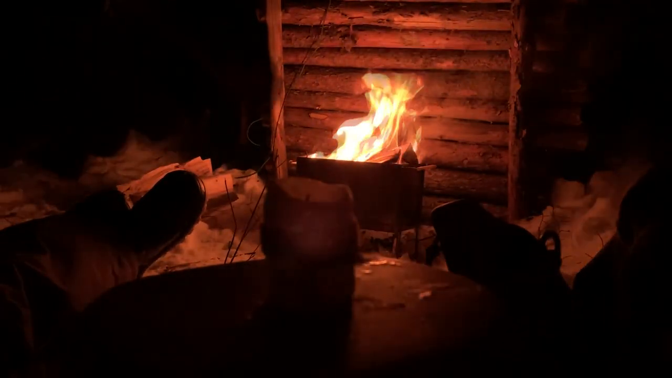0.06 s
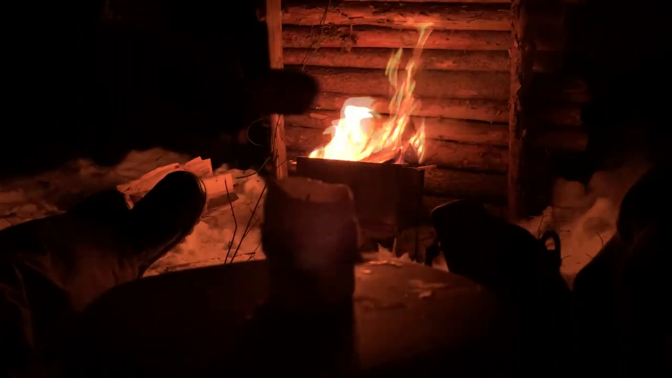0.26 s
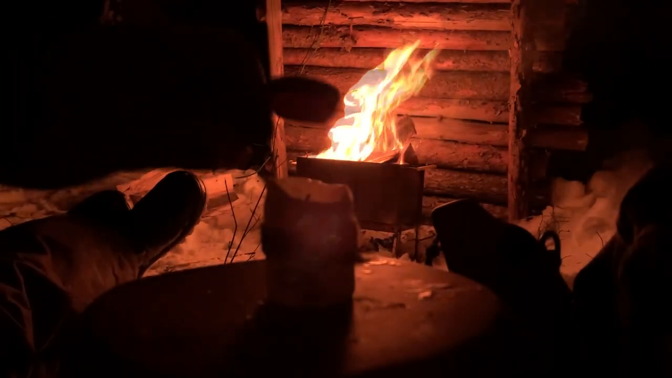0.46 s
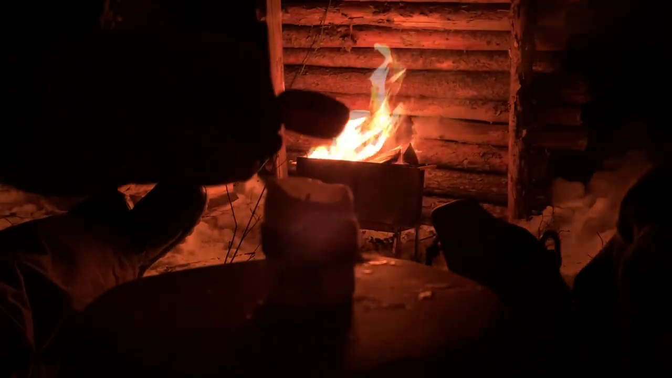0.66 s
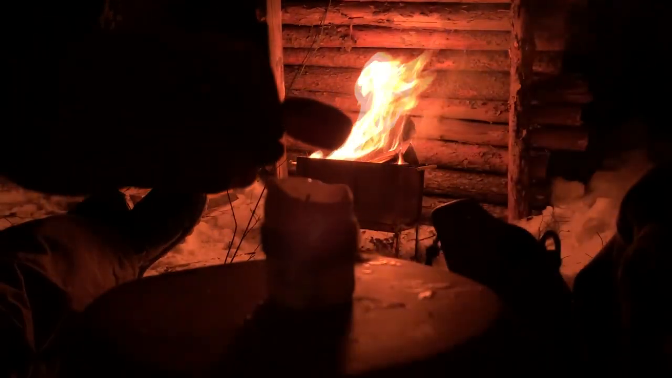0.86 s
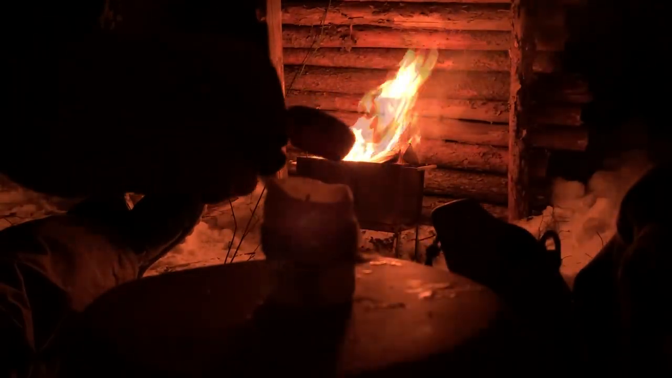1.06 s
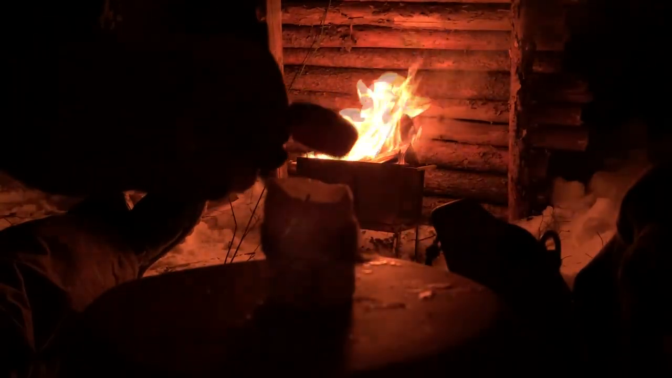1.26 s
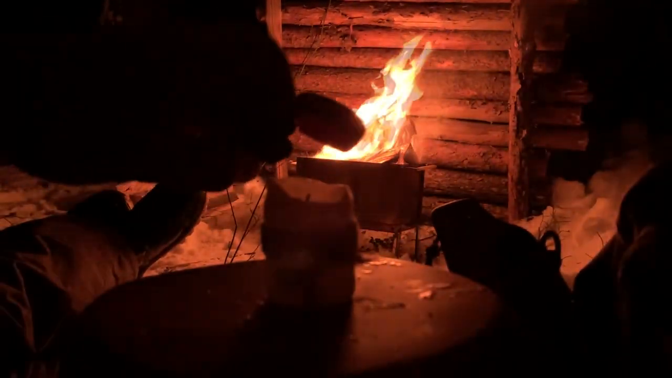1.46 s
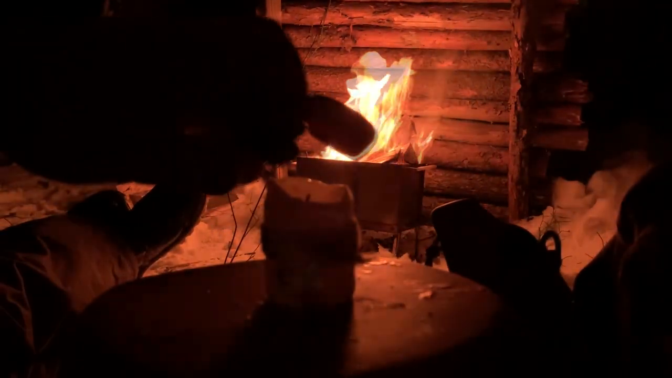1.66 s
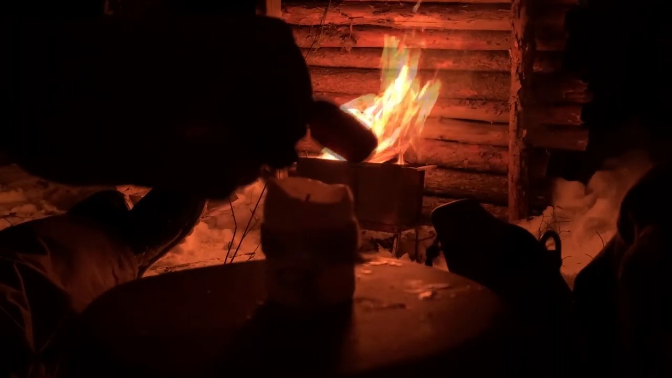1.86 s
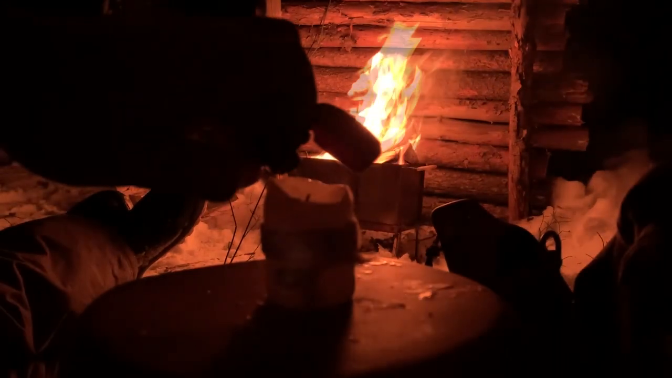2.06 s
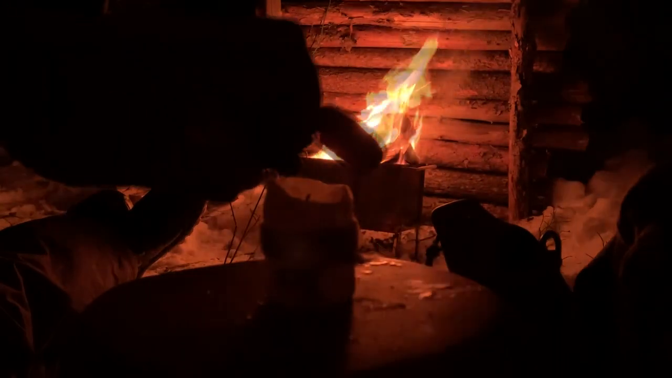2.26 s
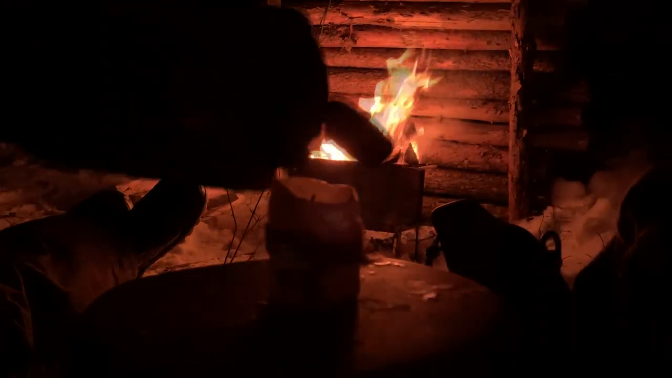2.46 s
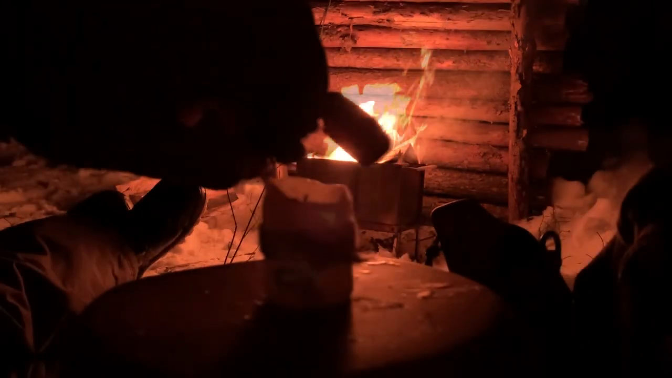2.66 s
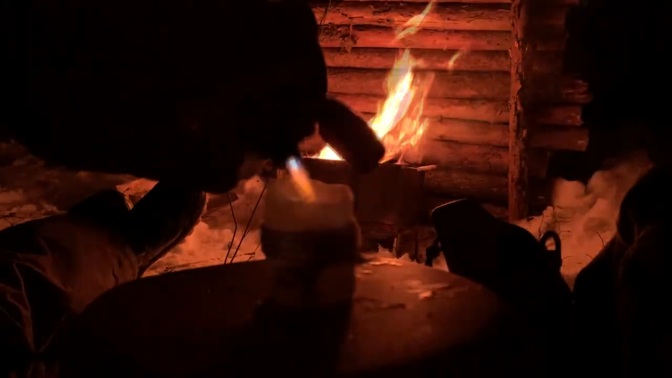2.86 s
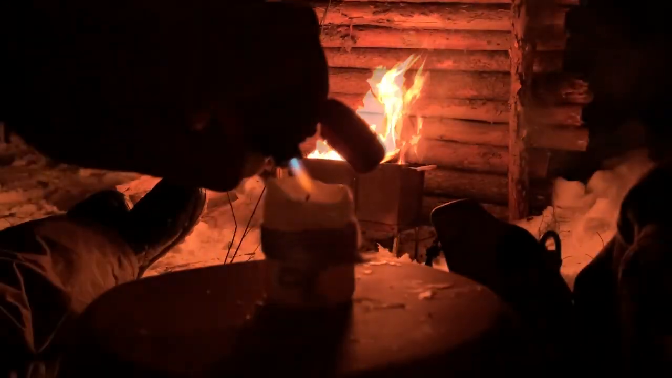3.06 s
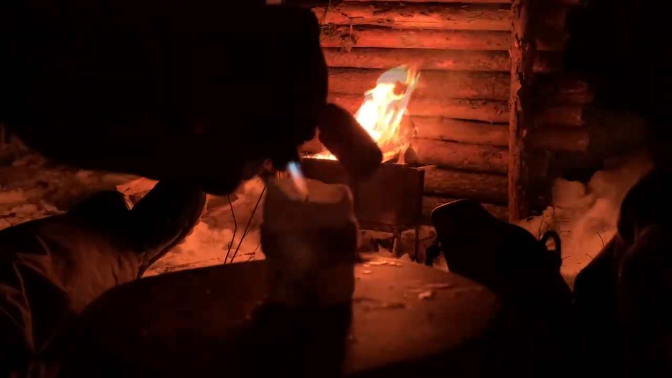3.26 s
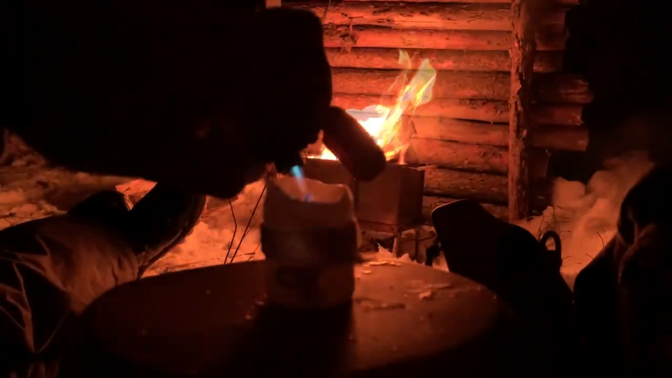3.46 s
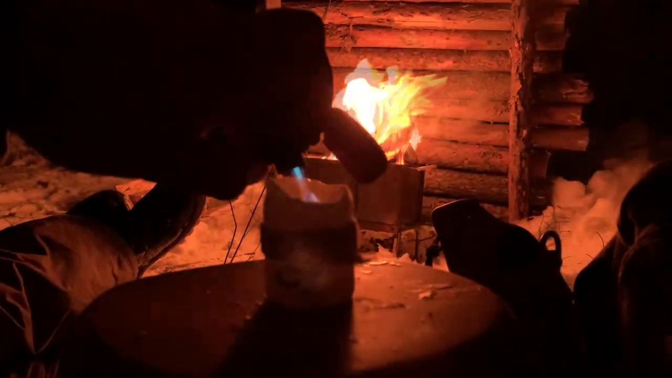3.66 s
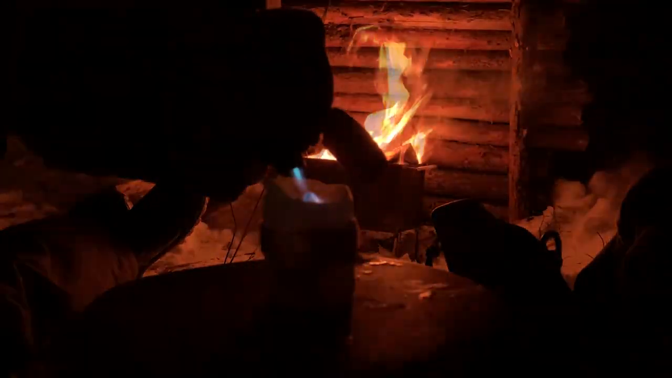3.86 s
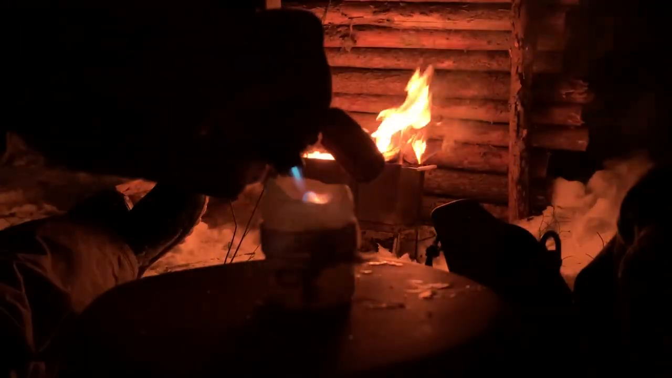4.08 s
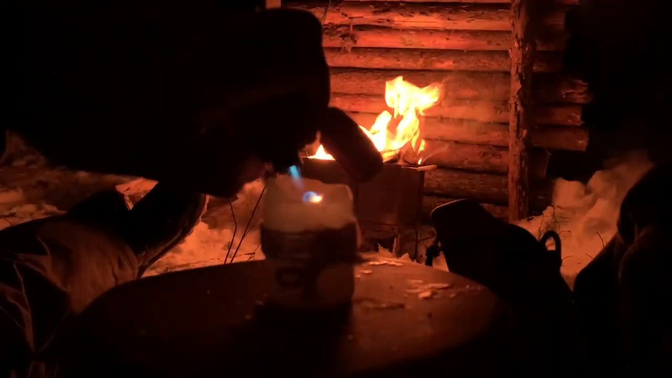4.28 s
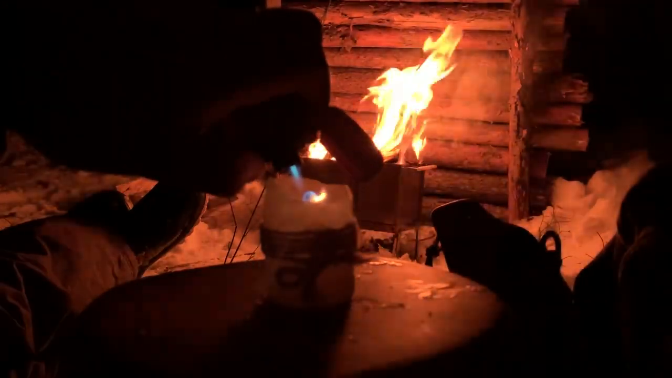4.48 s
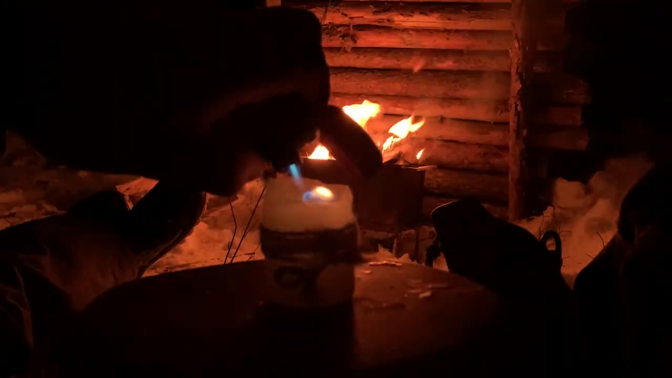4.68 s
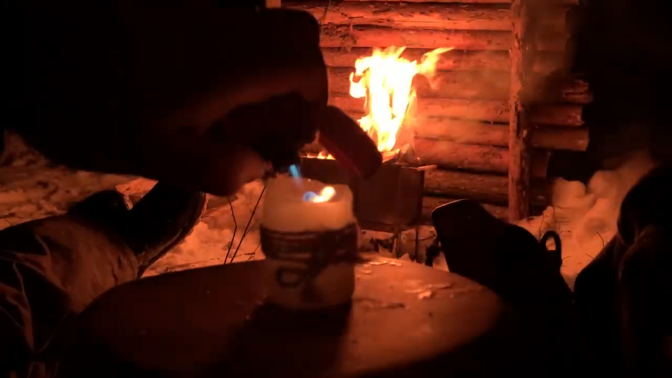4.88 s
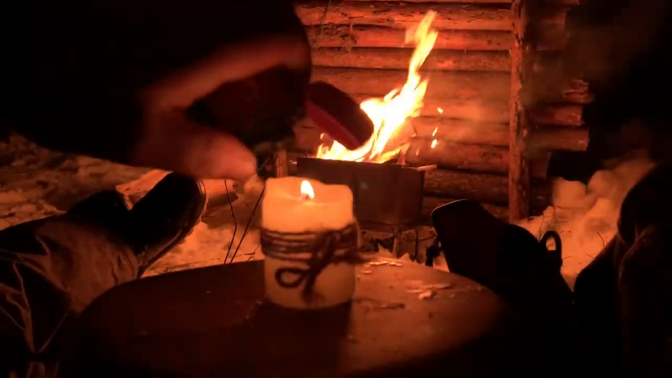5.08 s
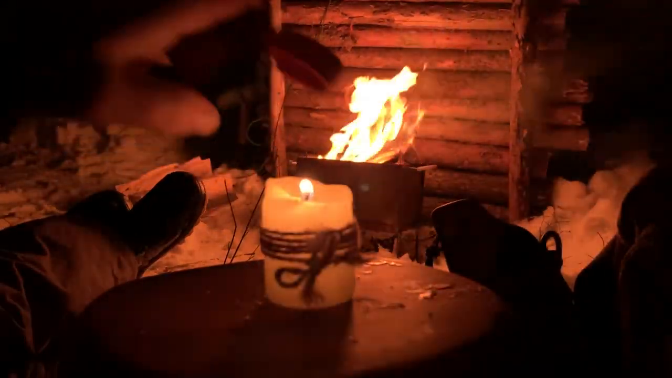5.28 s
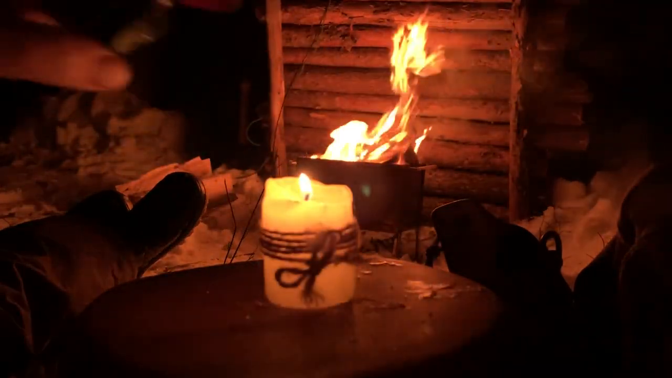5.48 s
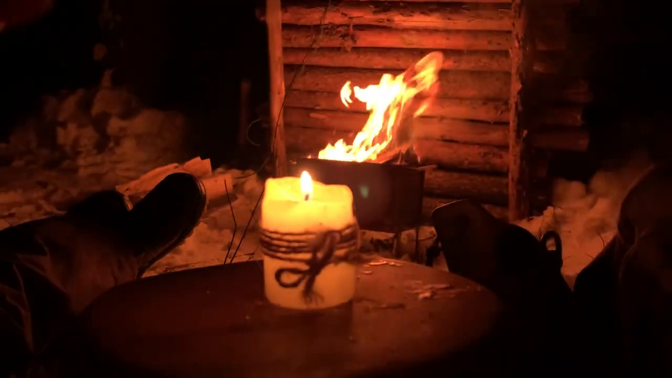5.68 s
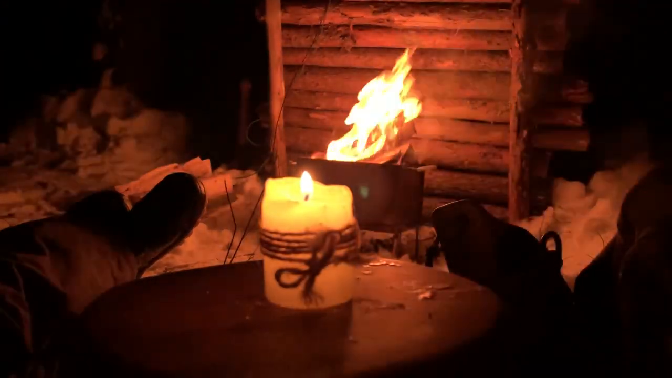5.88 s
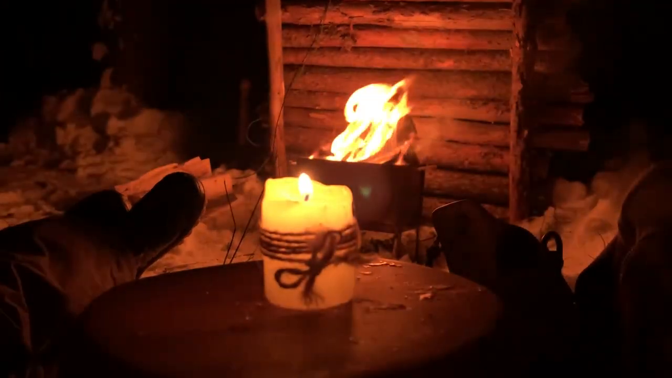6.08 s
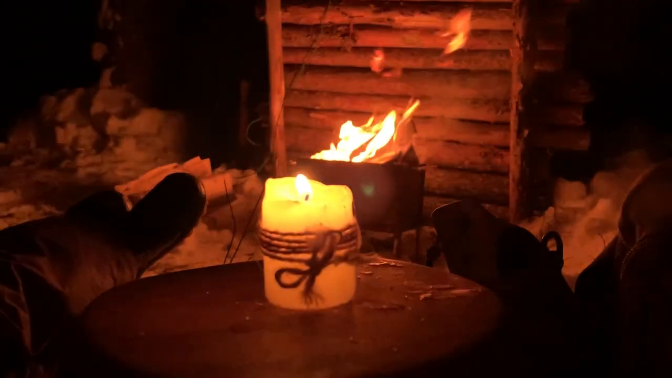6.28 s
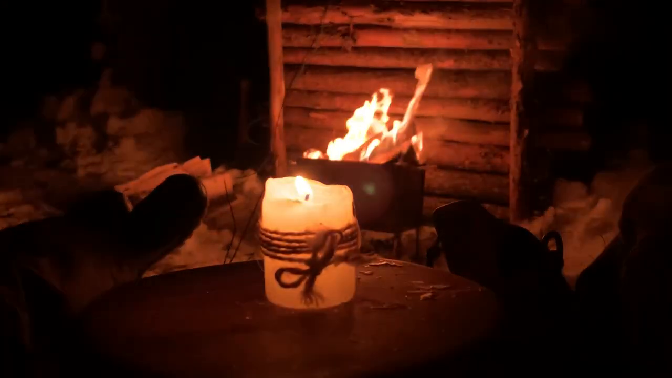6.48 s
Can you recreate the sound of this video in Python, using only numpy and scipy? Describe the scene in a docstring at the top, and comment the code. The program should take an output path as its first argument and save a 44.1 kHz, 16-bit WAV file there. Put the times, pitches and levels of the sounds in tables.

```python
"""A wood fire flutters at a night camp and a jacket sleeve swishes; close by, a torch lighter lights a candle.
Gas hisses, the piezo hammer snaps and fails, the trigger springs back; a second snap lights a softly roaring jet.
Wax sputters at the wick, the trigger is let go, the sleeve swishes back and the lighter drops on the table.
Fire, gas, flame and wax start from shaped noise, rubbing from random tiny slips,
and knocks from short bursts of noise and fading notes."""
import sys
import numpy as np
from scipy import signal
from scipy.fft import rfft, irfft, next_fast_len
from scipy.io import wavfile
from scipy.ndimage import uniform_filter1d

SR = 44100
rng = np.random.default_rng(int(sys.argv[2]) if len(sys.argv) > 2 else 0)


def bounce(signal):
    """Save signal as a 16-bit WAV file at the path given by the first command-line argument."""
    frames = np.transpose(np.atleast_2d(signal))
    limited = np.clip(frames, -1, 1)
    pcm = np.round(limited * 32767).astype(np.int16)
    wavfile.write(sys.argv[1], SR, pcm)


N = 287973
TIME = np.arange(N) / SR  # seconds, whole scene
HIT = TIME[:SR // 6]  # seconds, one short blow

# Surges of the fire. Each row: start in seconds, length in seconds, rise in dB.
SURGES = [(0.1, 0.58, 5), (1.1, 0.19, 4.5), (2.2, 0.4, 1.5), (2.88, 0.69, 4), (3.65, 0.41, 4.5),
          (4.047, 0.72, 5), (4.817, 0.31, 7), (5.199, 0.63, 5.5), (5.95, 0.31, 4.5)]
# Strokes of the sleeve. Each row: start, attack, hold and release in seconds,
# then levels of the rubbing, the hiss of the weave and the sizzle in dB.
STROKES = [(0.0, 0.0033, 0.04, 0.5, -66, -89, -100), (5.196, 0.34, 0.037, .45, -61, -75, -80.5),
           (5.509, 0.048, 0.016, 0.3, -58, -61, -62), (5.65, 0.12, .45, 0.55, -68, -76, -81.5),
           (5.978, 0.078, 0.07, 0.24, -47, -51.5, -58), (6.392, 0.097, 0.044, 0.11, -61.5, -72, -88)]
# Thin notes in the rubbing. Each row: start, attack, hold and release in seconds, pitch in Hz,
# middle level in dB.
SQUEAKS = [(0.0, .02, .1, .4, 884, -72), (5.826, .06, .08, .06, 2610, -75)]
# Creaks and ticks of the grip and the wick. Each row: time in seconds, level in dB before a 2 dB cut,
# treble against the whole in dB, centre of the treble in Hz.
TICKS = [(0.42, -63, -17, 5000), (0.589, -68, -3, 4930), (1.131, -61.5, -22, 5030),
         (1.191, -65, -3.5, 6800), (1.231, -64, -24, 5000), (1.334, -53, -12, 4700),
         (1.442, -56.5, -5.5, 6800), (1.477, -58.5, -2, 6300), (1.501, -56.5, 0, 6300),
         (1.536, -64.5, 1, 6550), (2.302, -52.5, -18, 5000), (2.326, -59.5, -15, 5000),
         (2.383, -54, -15, 5000), (3.596, -59, -2, 5830), (3.66, -61.5, -5, 14000),
         (3.834, -58.5, -3.5, 4700), (4.067, -64, -5, 7000), (4.112, -66, 1.5, 12850),
         (4.305, -57.5, -4, 9350), (4.494, -58.5, -2, 7900), (4.784, -61, -6, 14000),
         (4.883, -57, -4, 4980)]
# The trigger hits its stops. Each row: time in seconds, level in dB, first contact note in dB,
# bright share in dB, ring of a steel part in Hz, level of that ring in dB.
TRIGGER_STOPS = [(0.9526, -51, 6, -20, 2930, -10), (2.4668, -31.5, 8, -3, 5950, -10.5),
                 (2.5721, -38.5, -1, -19, 2550, -13.5), (5.0275, -37.5, 17.5, 2, 5990, -14.5)]
# Dull low thumps. Each row: time in seconds, level in dB, pitch in Hz, time to fade by 60 dB in seconds.
THUMPS = [(1.131, -43, 103.6, 0.21), (1.641, -35, 125, 0.059), (1.678, -33, 90, 0.092),
          (1.85, -35, 113, 0.077), (1.927, -38, 99.5, 0.048), (2.371, -36.5, 127, 0.062),
          (2.7848, -15, 158.5, 0.03), (5.314, -38, 145.5, 0.06)]
# Openings of the gas valve. Each row: start, attack, hold and release in seconds,
# starting levels of the hiss and of its thin top in dB.
GAS_BURSTS = [(1.692, 0.033, .06, 0.11, -67, -51), (2.0, 0.026, .36, 0.07, -62, -52),
              (2.655, .05, .02, .06, -62, -58), (2.78, 0.0096, .01, .07, -72.5, -67)]
# Piezo hammer snaps. Each row: time in seconds, level in dB, delay of the rebound in seconds,
# rebound against the snap in dB before a further 1 dB cut.
SNAPS = [(2.0015, -20, 0.0028, -8), (2.7815, -20, 0.0034, -5.5)]
# The thumb drags on the trigger. Each row: start, attack, hold and release in seconds, middle level in dB.
THUMB_DRAGS = [(2.3, 0.093, 0.017, 0.023, -62), (2.458, 0.014, .01, 0.098, -58.5),
               (2.52, .055, .035, .03, -62.5), (5.027, 0.017, 0.01, 0.055, -60.5)]
# Slow level path of the burning jet. Each row: time in seconds, level in dB.
FLAME_LEVEL = [(2.85, -62), (3.244, -68.5), (3.45, -63), (4.47, -62.5), (4.85, -64.5)]
# The lighter lands on one end, then flat. Each row: time in seconds, level in dB.
LANDING = [(6.2705, -15), (6.2732, -13)]

# Ringing notes of the lighter's case. Each row: pitch in Hz, level in dB, time to fade by 60 dB in seconds.
CASE_MODES = [(1690, -8.5, .022), (2035, -6, .025), (2425, -12, 0.041), (2834, -6.5, 0.037),
              (4600, -13, 0.056), (4990, -11.5, 0.022), (8900, -12, .035), (10700, -8.5, 0.023),
              (11400, -11, 0.018), (12400, -6.5, 0.044)]
# Ringing notes of the table top under a sharp knock. Each row: pitch in Hz, level in dB,
# time to fade by 60 dB in seconds.
TABLE_MODES = [(474, -13, 0.0066), (770, -7, 0.012), (1055, -9.5, 0.018), (1392, 0.5, 0.011),
               (2930, 5, 0.014), (3300, -2, 0.027)]

# Tone of the fluttering fire. Each row: pitch in Hz, relative level in dB.
FLUTTER_COLOUR = [(25, -27), (38, -12.5), (54, -2.5), (80, -0.5), (110, -1), (160, -2.5), (195, -7.5),
                  (240, -14.5), (325, -23), (420, -32), (700, -40.5)]
# Tone of the still air. Each row: pitch in Hz, relative level in dB.
AIR_COLOUR = [(500, -3.5), (650, -5.5), (1200, -8), (2400, -11), (3500, -13.5), (8700, -13), (16000, -14.5)]
# Tone of the rubbing cloth. Each row: pitch in Hz, relative level in dB.
CLOTH_COLOUR = [(250, -1.5), (350, 0.5), (500, -1), (650, -0.5), (860, -2.5), (1250, -5.5), (1650, -9),
                (2000, -8.5), (2400, -10.5), (2720, -11), (3100, -11.5), (4200, -14), (7000, -21.5)]
# Tone of the hissing weave. Each row: pitch in Hz, relative level in dB.
WEAVE_COLOUR = [(2500, -16), (4200, -1.5), (6000, -4.5), (7500, -2.5), (9000, 1.5), (12500, 0), (14500, -4),
                (16000, -6.5)]
# Tone of gas whistling through the nozzle. Each row: pitch in Hz, relative level in dB.
NOZZLE_COLOUR = [(900, -25), (1300, -20.5), (2300, -15.5), (3900, -25), (4550, -8.5), (5000, -14),
                 (5700, -24.5), (6900, -24.5), (7700, -9.5), (8500, 4), (9600, -9.5), (12500, -20.5),
                 (16000, -25.5)]
# Tone of the thin top of the gas hiss. Each row: pitch in Hz, relative level in dB.
THIN_HISS_COLOUR = [(1150, -36.5), (1550, -10.5), (2000, -9), (2900, -9.5), (3500, -22.5), (4150, -22.5),
                    (4550, -7.5), (5100, -17), (6200, -16.5), (7300, -1.5), (10000, 0), (13000, -6),
                    (16000, -10)]
# Tone of skin dragging on the trigger. Each row: pitch in Hz, relative level in dB.
THUMB_COLOUR = [(700, -11.5), (1100, -6.5), (1400, -7), (1730, -4), (2000, -10), (2630, -4.5), (5500, -10),
                (9000, -8), (16000, -4)]
# Tone of the roaring jet. Each row: pitch in Hz, relative level in dB.
ROAR_COLOUR = [(150, -31), (250, 0.5), (334, -6.5), (412, 0.5), (513, 2), (678, -5.5), (779, 3.5),
               (994, -3.5), (1280, -3), (1620, -13), (1820, -21.5), (2110, -27.5), (2290, -20.5),
               (4000, -41), (5200, -67), (8800, -120)]

# More tones of single sounds, named for them. Each row: pitch in Hz, relative level in dB.
EMBER_COLOUR = [(1200, -0.5), (4700, -5.5), (8000, -5.5), (15000, -10)]
SIZZLE_COLOUR = [(9000, -20), (10500, -7.0), (12300, -15.5), (14400, 1.0), (16000, -11.5)]
DULL_TICK = [(700, -20.0), (1200, -13.5), (1650, 1.0), (2500, -10.5), (3500, -17.5), (7000, -29.5)]
HOLLOW_KNOCK = [(500, -20.0), (1020, -24), (1550, 1.0), (2850, -2.0), (3600, -15), (5000, -21),
                (8000, -17.5), (16000, -24)]
SHARP_CRACK = [(3000, -21.0), (5500, -12.0), (8500, -17.0), (10100, 0.0), (11500, -8), (16000, -18)]
STEEL_CLATTER = [(250, -17.5), (500, -21.5), (1100, -20), (1700, 0.0), (2800, 0.5), (3500, -4.5),
                 (5000, 0), (8000, 2.5), (10500, 3.5), (13000, 3), (16000, 0.0)]
JET_HISS = [(2700, 0.5), (3800, -7.5), (4700, 5.5), (5600, -9.0), (7300, -5), (9500, -0.5),
            (12000, -9.0), (14500, 1), (16000, -3.5)]
FLARE_COLOUR = [(1100, -0.5), (1800, -3), (3000, -11), (6000, -22.5), (11000, -22), (15000, -18)]
SPUTTER_COLOUR = [(1700, -3), (2500, 17), (3400, -16), (4700, -13), (6500, -16)]
CRACKLE_COLOUR = [(3000, 3), (5500, -4), (10000, -10), (14000, -9), (16000, -13)]
LANDING_CLACK = [(280, -22), (420, -7.5), (1400, -0.5), (2200, -3.5), (3100, 1.0), (4200, 1),
                 (7000, -1.0), (8200, -5.5), (10700, 4), (13000, -4.5), (16000, -2.5)]
TAIL_COLOUR = [(500, -3.0), (1500, 3.5), (3000, -7), (5500, -1.5), (15000, -9)]

FIRE_DB, FIRE_SWELL_DB, FIRE_FLICKER_DB = -60, 0.95, 1.4  # calm level, its slow and its quick spread
EMBERS_DB, AIR_DB = -99, -81
TICK_T60_S = .022
SAG_DB_PER_S, TOP_SAG_DB_PER_S = 28.5, 90.5  # the hiss sinks with the pressure, its thin top faster
POP_S, POP_DB = 2.784, -41
LIT_S, OUT_S = 2.79, 5.06  # the jet lights and goes out
FLARE_DB, FLARE_RELEASE_S = -64.5, 0.16
WICK_S, SPUTTER_DB, CRACKLE_DB = 3.45, -88, -88  # the jet reaches the wick; sputter level before it grows
TOP_HZ = 15800


def undb(db):
    """Turn decibels into a gain."""
    return 10 ** (np.asarray(db) / 20)


def unit(x):
    """Scale to an average strength (rms) of 1."""
    return x / np.sqrt(np.mean(x ** 2))


def curve(rows):
    """Join rows of time and value with straight lines."""
    return np.interp(TIME, *np.array(rows).T)


def envelope(s, attack, hold, release):
    """A smooth rise from time s, a hold and a smooth fall."""
    corners = s + np.cumsum([0, attack, hold, release])
    ramp = np.interp(TIME, corners, [0, 1, 1, 0])
    return np.sin(np.pi / 2 * ramp) ** 2


def colour(x, points):
    """Filter through (Hz, dB) points with steep skirts, never sounding early; white noise keeps its power."""
    size = next_fast_len(len(x) // 2 + 2048) * 2
    hz, db = np.array(sorted(points)).T
    octave = np.log2(np.maximum(np.arange(size // 2 + 1), 1) * SR / size)
    outside = np.abs(octave - np.clip(octave, np.log2(hz[0]), np.log2(hz[-1])))
    skirt_db = np.minimum(24 * outside, 50)
    gain = unit(undb(np.interp(octave, np.log2(hz), db) - skirt_db))
    # Folding the cepstrum forward gives minimum phase: the response starts at once.
    cepstrum = irfft(np.log(gain))[:size // 2]
    cepstrum[1:] *= 2
    response = np.exp(rfft(cepstrum, size))
    return irfft(rfft(x, size) * response)[:len(x)]


def noise(points):
    """Steady coloured noise of rms 1."""
    return unit(colour(rng.standard_normal(N), points))


def walk(rate):
    """Smooth random wandering of rms 1, with about `rate` new values a second."""
    k = max(int(SR / rate), 1)
    steps = np.repeat(rng.standard_normal(N // k + 1), k)
    return unit(uniform_filter1d(steps, k)[:N])


def grains(rate, spread_db):
    """Random tiny slips of uneven size, about `rate` a second, rms 1."""
    slips = rng.random(N) < rate / SR
    size = rng.standard_normal(N) * undb(spread_db * rng.standard_normal(N))
    return unit(slips * size)


def fade(t60):
    """Steady dying away of a blow, by 60 dB in t60 seconds."""
    return np.exp(-np.log(1000) * HIT / t60)


def rattle(t60):
    """Fading noise for the dense, fast-dying notes of small parts."""
    return rng.standard_normal(len(HIT)) * fade(t60)


def ring(hz, t60):
    """One struck note."""
    return np.sin(2 * np.pi * hz * HIT) * fade(t60)


def body(modes):
    """All notes of a struck object, alternating in sign."""
    return sum((-1) ** k * undb(db) * ring(hz, t60) for k, (hz, db, t60) in enumerate(modes))


def add(out, s, sound):
    """Mix a sound in at time s."""
    i = int(s * SR)
    out[i:i + len(sound)] += sound[:N - i]


def campfire():
    """Flames flutter low and surge now and then; the embers tick faintly in the still air."""
    surge = sum(db * envelope(s, 0.17 * length, 0.56 * length, .3 * length) for s, length, db in SURGES)
    unrest = FIRE_SWELL_DB * walk(rate=5) + FIRE_FLICKER_DB * walk(rate=22)
    flutter = undb(FIRE_DB + surge + unrest) * noise(FLUTTER_COLOUR)
    pops = signal.fftconvolve(grains(rate=14, spread_db=1), rattle(t60=0.043))[:N]
    embers = undb(EMBERS_DB) * unit(colour(pops, EMBER_COLOUR))
    return flutter + embers + undb(AIR_DB) * noise(AIR_COLOUR)


def sleeve():
    """Countless jacket threads slip over each other with each arm stroke; the smooth shell sizzles on top."""
    strokes = np.array([envelope(*row[:4]) for row in STROKES])
    gains = undb(np.array(STROKES)[:, 4:])
    # Overlapping strokes add up in power.
    rub, hiss, shell = np.sqrt(gains.T ** 2 @ strokes ** 2)
    uneven = undb(1.2 * walk(rate=35) + .5 * walk(rate=90))
    cloth = rub * uneven * colour(grains(rate=8000, spread_db=1.5), CLOTH_COLOUR)
    return cloth + hiss * noise(WEAVE_COLOUR) + shell * noise(SIZZLE_COLOUR)


def squeak():
    """Something rubs with a faint, thin note as the arm moves: noise in a narrow band."""
    out = np.zeros(N)
    for s, attack, hold, release, hz, db in SQUEAKS:
        level = undb(db + 2 * walk(rate=40))
        note = noise([(hz * 0.84, -25), (hz, 0), (hz * 1.175, -25)])
        out += envelope(s, attack, hold, release) * level * note
    return out


def ticks():
    """Faint clicks, each a dull part and a bright part."""
    out = np.zeros(N)
    for s, db, treble_db, hz in TICKS:
        # The dull part takes the power that the treble leaves.
        dull_gain = np.sqrt(max(1 - undb(treble_db) ** 2, .02))
        low = dull_gain * colour(rattle(TICK_T60_S), DULL_TICK)
        bright = [(hz * 0.31, -13), (hz, 0), (hz * 1.28, -11), (hz * 2.0, -17)]
        high = undb(treble_db) * colour(rattle(TICK_T60_S), bright)
        add(out, s, undb(db - 2.0) * (low + high))
    return out


def trigger():
    """A sharp plastic crack, the case ringing, and the thin note of a spring or the hammer."""
    out = np.zeros(N)
    for s, db, contact_db, bright_db, steel_hz, steel_db in TRIGGER_STOPS:
        knock = colour(rattle(t60=0.025), HOLLOW_KNOCK) + undb(-10) * body(CASE_MODES)
        contact = undb(contact_db) * ring(hz=10150, t60=.005)
        crack = contact + undb(3.0) * colour(rattle(t60=0.045), SHARP_CRACK)
        steel = undb(steel_db) * ring(hz=steel_hz, t60=0.11)
        add(out, s, undb(db) * (knock + undb(bright_db) * crack + steel))
    return out


def thumps():
    """Soft pushes of air from the moving arm and, loudest, from the gas catching."""
    out = np.zeros(N)
    swell = 1 - np.exp(-HIT / 0.0037)
    for s, db, hz, t60 in THUMPS:
        add(out, s, undb(db) * swell * ring(hz, t60))
    return signal.sosfilt(signal.butter(2, 50, "highpass", fs=SR, output="sos"), out)


def gas():
    """Unlit gas whistles through the nozzle; the top of the hiss goes first as the pressure sags."""
    whistle, top = np.zeros(N), np.zeros(N)
    for s, attack, hold, release, db, top_db in GAS_BURSTS:
        valve = envelope(s, attack, hold, release)
        age = np.maximum(TIME - s, 0)
        whistle += valve * undb(db - SAG_DB_PER_S * age)
        top += valve * undb(top_db - TOP_SAG_DB_PER_S * age)
    return whistle * noise(NOZZLE_COLOUR) + top * noise(THIN_HISS_COLOUR)


def snaps():
    """The hammer slips its catch, strikes the crystal and rebounds, ringing itself and the case."""
    out = np.zeros(N)
    for s, db, delay, rebound_db in SNAPS:
        catch = colour(rattle(t60=0.021), STEEL_CLATTER)
        clatter = colour(rattle(t60=0.047) + undb(-27.5) * rattle(t60=0.087), STEEL_CLATTER)
        hammer = undb(1.0) * ring(hz=2583, t60=0.041)
        rebound = colour(rattle(t60=0.028), STEEL_CLATTER)
        add(out, s - .003, undb(db - 13.5) * catch)
        add(out, s, undb(db) * (clatter + hammer + undb(-0.5) * body(CASE_MODES)))
        add(out, s + delay, undb(db + rebound_db - 1) * rebound)
    return out


def thumb():
    """Skin sticks and slips on the sliding trigger."""
    drag = sum(undb(db) * envelope(s, attack, hold, release) for s, attack, hold, release, db in THUMB_DRAGS)
    uneven = undb(1.6 * walk(rate=250))
    return drag * uneven * colour(grains(rate=4000, spread_db=0.0), THUMB_COLOUR)


def pop():
    """The gas catches in the mouth of the nozzle, a short hollow note."""
    out = np.zeros(N)
    note = ring(hz=560, t60=.035) + undb(-9) * ring(hz=700, t60=0.015)
    add(out, POP_S, undb(POP_DB) * note)
    return out


def flame():
    """Spilt gas flares and burns off as the jet catches, then the jet roars with a faint hiss above."""
    burning = np.clip((TIME - LIT_S) / 0.0082, 0, 1) * np.clip((OUT_S - TIME) / 0.055, 0, 1)
    level = undb(curve(FLAME_LEVEL) + 0.83 * walk(rate=22))
    hiss = undb(-25 + 2 * walk(rate=16)) * noise(JET_HISS)
    jet = level * (noise(ROAR_COLOUR) + hiss)
    burn_off = envelope(LIT_S, attack=.01, hold=.01, release=FLARE_RELEASE_S)
    flare = undb(FLARE_DB) * burn_off * noise(FLARE_COLOUR)
    return burning * jet + flare


def wick():
    """Wax sputters in uneven puffs under the jet, more as the wick heats, and crackles in soft clusters."""
    heated = np.clip((TIME - WICK_S) / 0.2, 0, 1) * (TIME < OUT_S)
    growth = undb(2.27 * np.clip(TIME - WICK_S, 0, 2))  # 2.27 dB per second
    puffs = unit(undb(5.5 * walk(rate=16)) * noise(SPUTTER_COLOUR))
    sputter = growth * undb(SPUTTER_DB) * puffs
    slips = grains(rate=12, spread_db=2)
    clusters = np.sqrt(np.abs(signal.fftconvolve(slips ** 2, fade(t60=0.046))[:N]))
    crackle = undb(CRACKLE_DB) * unit(clusters * noise(CRACKLE_COLOUR))
    return heated * (sputter + crackle)


def landing():
    """Two quick knocks on the table, the lighter's parts clattering."""
    out = np.zeros(N)
    for s, db in LANDING:
        clack = colour(rattle(t60=.022) + undb(-17.0) * rattle(t60=0.063), LANDING_CLACK)
        ringing = undb(-3.0) * body(TABLE_MODES) + undb(-16.5) * body(CASE_MODES)
        add(out, s, undb(db) * (clack + ringing))
    return out


def scatter(x):
    """The log wall and the things about the camp return a faint, short tail."""
    build_up = 1 - fade(t60=.08)
    tail = colour(rattle(t60=0.17) * build_up, TAIL_COLOUR)
    tail = tail / np.sqrt(np.sum(tail ** 2))
    return undb(-43.0) * signal.fftconvolve(x, tail)[:N]


def scene():
    """Everything at one microphone; the lighter and its ticks also get the tail of the camp."""
    lighter = ticks() + trigger() + gas() + snaps() + thumb() + pop() + flame() + landing()
    around = campfire() + sleeve() + squeak() + thumps() + wick()
    return (lighter + scatter(lighter) + around)[None]


def record(dry):
    """The loudest peaks are rounded off and the very top of the treble is cut."""
    rounded = np.tanh(1.294 * dry) / 1.285
    return signal.sosfilt(signal.ellip(10, .2, 80, TOP_HZ, fs=SR, output="sos"), rounded)


dry = scene()
out = record(dry)
bounce(out)
```